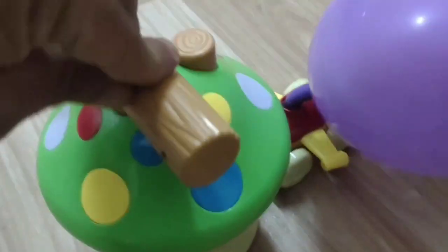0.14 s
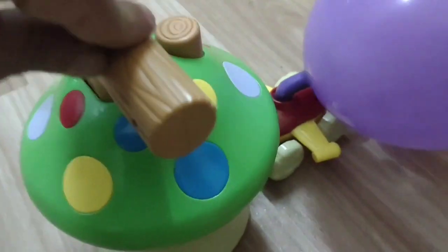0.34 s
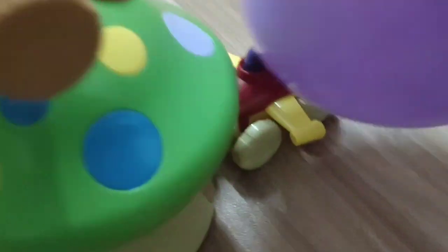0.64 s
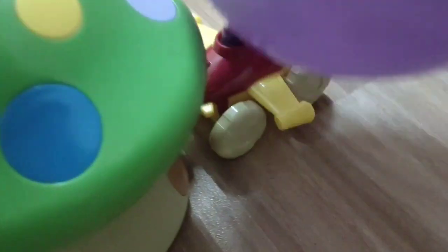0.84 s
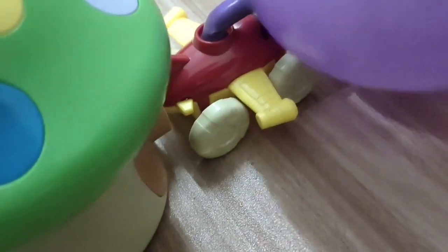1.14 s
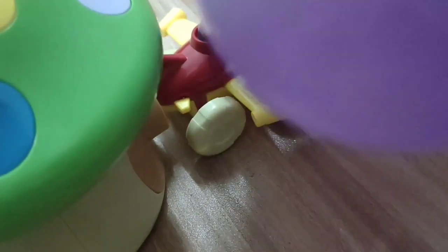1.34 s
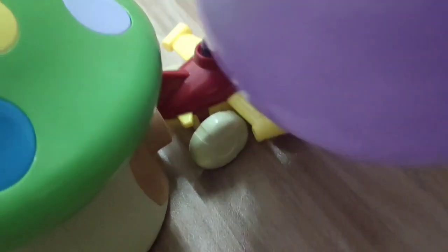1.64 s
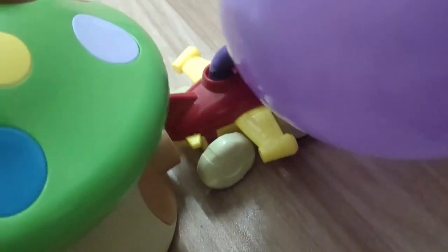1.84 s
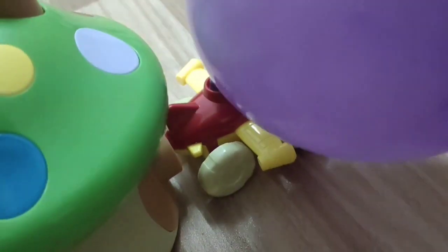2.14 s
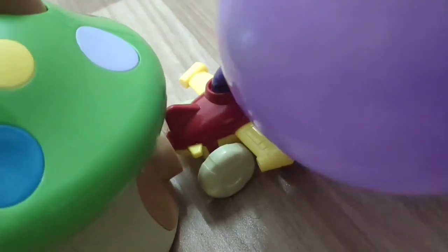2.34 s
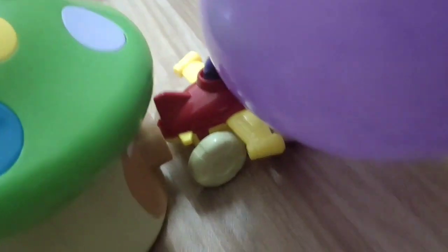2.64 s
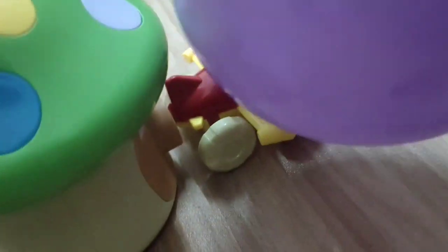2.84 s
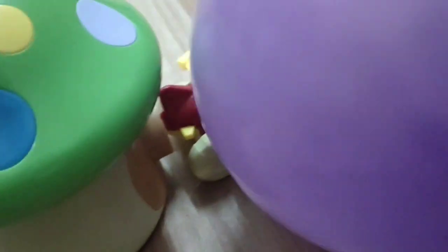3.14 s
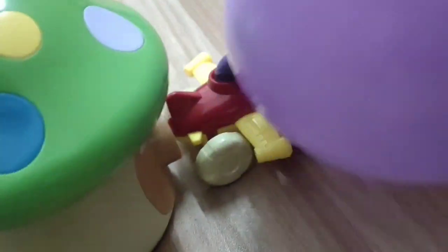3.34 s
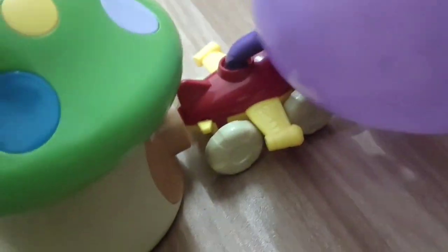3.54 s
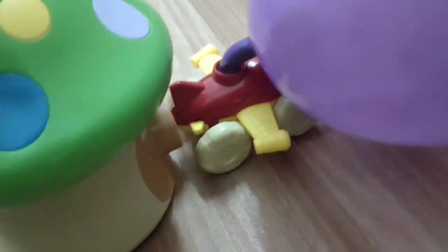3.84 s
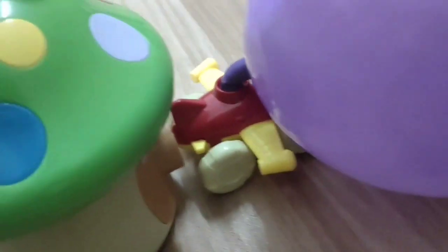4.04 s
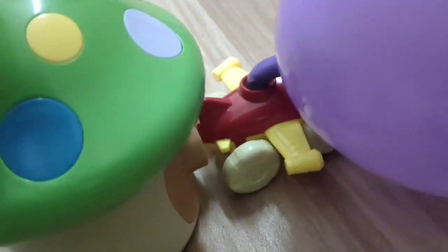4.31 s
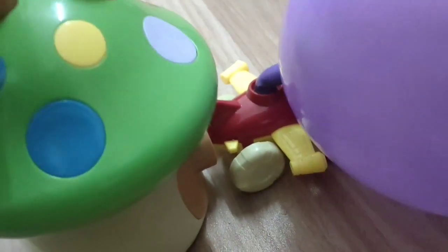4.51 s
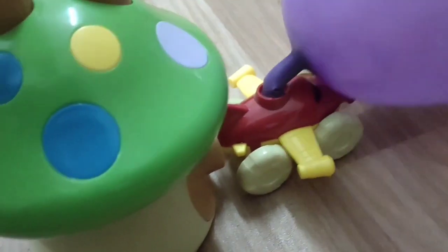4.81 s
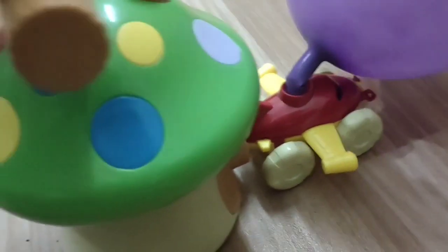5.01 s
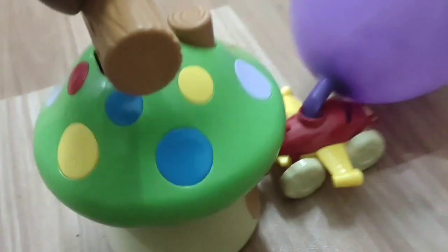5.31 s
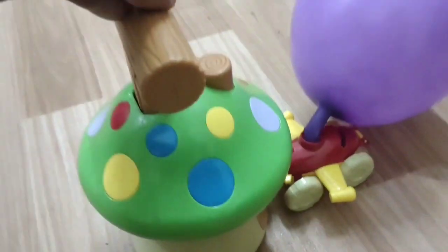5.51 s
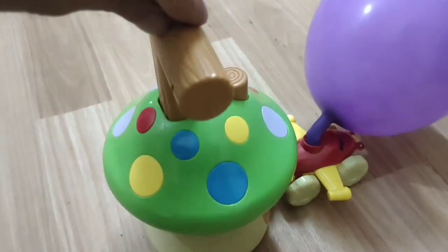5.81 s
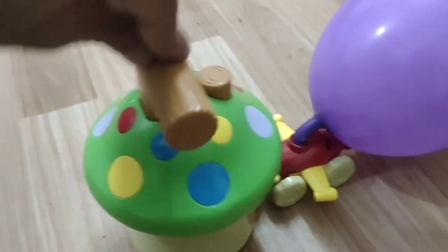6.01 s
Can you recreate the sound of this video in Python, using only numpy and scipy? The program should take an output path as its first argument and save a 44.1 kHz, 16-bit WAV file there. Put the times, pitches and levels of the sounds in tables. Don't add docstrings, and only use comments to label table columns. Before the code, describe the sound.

Short turbulent air jets, bright and sizzly with a slightly hollow barrel tone, come from a small plastic pump very close to the microphone. Between them air is drawn in softly, the plunger clicks and the base thuds. After the first puff comes a long lull, then four pushes, the third of the whole series being strong and the fourth strongest. Faint room rumble, distant hum and a thin insect-like flutter lie behind.

```python
import sys
import numpy as np
from scipy import signal
from scipy.fft import rfft, irfft, next_fast_len
from scipy.io import wavfile
from scipy.ndimage import uniform_filter1d

SR = 44100
rng = np.random.default_rng(int(sys.argv[2]) if len(sys.argv) > 2 else 0)


def gain_from_db(level_db):
    decades = np.asarray(level_db, float) / 20
    return 10 ** decades


def dump(signal):
    limited = np.clip(np.atleast_2d(signal).T, -1, 1)
    pcm = np.round(limited * 32767).astype(np.int16)
    wavfile.write(sys.argv[1], SR, pcm)


N = 271656

# time in seconds, jet level in dB.
STROKES = [
    [(0.0, -42.5), (0.016, -48.5), (0.03, -36), (0.122, -30), (0.172, -30), (0.198, -45), (0.3, -59)],
    [(2.756, -51), (2.766, -37), (2.788, -31.5), (2.856, -28.5), (2.964, -36), (3.032, -58), (3.06, -48)],
    [(3.45, -70), (3.48, -48), (3.5, -41), (3.548, -29.5), (3.632, -26), (3.652, -40), (3.7, -50.5),
     (3.76, -55)],
    [(4.19, -77), (4.24, -37), (4.33, -25), (4.39, -28.5), (4.416, -40), (4.47, -53.5), (4.52, -60)],
    [(4.938, -57), (4.946, -46.5), (5.026, -31), (5.118, -33), (5.198, -52.5), (5.24, -47)],
    [(6.07, -78), (6.094, -65), (6.13, -45.5), (6.16, -42)],
]
# valve sizzle over the jet at the start in dB, its sag in dB per second,
# barrel ring over the jet in dB.
STROKE_COLOURS = [(14.7, 40, 1), (8.9, 25, -2), (20.7, 122, -3.5), (19.2, 105, -6.5), (6, 45, -4),
                  (8, 33, 3)]
# left lag in samples, right port sizzle in dB,
# lower valve resonance in Hz, its level in dB.
PORT_PATHS = [(1.1, -11.5, 11260, 0), (5.85, -9, 10850, -1), (3.26, -11, 10850, 3.5), (3.35, -13, 10800, 3),
              (3.34, -11, 11400, -2), (1.8, -7, 11500, 4)]
# frequency in Hz, density in dB per Hz.
JET_SPECTRUM = [(470, -46), (900, -11.5), (2000, -16), (3200, -7), (4500, -1), (5600, -1.5), (8000, -0.5),
                (10500, -6.5), (12500, -19), (15500, -24.5)]
# frequency in Hz, width in Hz, level in dB.
VALVE_RESONANCES = [(13090, 1240, 5.5), (14100, 1100, -6.5)]
# frequency in Hz, width in Hz.
BARREL = (3116, 1950)
# null in Hz, glide in Hz per second, width in
# Hz, second null in Hz, its width in Hz.
STROKE_NULLS = [(9250, 1400, 260, 7150, 400), (4020, -700, 560, 7620, 340), (3860, 1100, 460, 8550, 520),
                (4070, -300, 400, 8620, 520), (12020, -800, 180, 8500, 60), (4000, 0, 60, 8500, 60)]
# null in Hz, width in Hz.
RIGHT_NULLS = [(5800, 460), (12150, 400), (14150, 480)]
# frequency in Hz, density in dB per Hz.
WASH_SPECTRUM = [(15, -73), (25, -65), (49, -27), (97, -4), (116, -14.5), (133, -9), (197, 1.5), (311, -3),
                 (745, -9), (798, -11.5), (1070, -7), (1550, -16.5), (2190, -18.5), (2800, -22),
                 (3300, -28), (6000, -39), (7800, -56), (13200, -120)]
# frequency in Hz, likeness from 0 to 1.
WASH_LIKENESS = [(30, .5), (60, 0.85), (130, 1), (290, 0.9), (640, 0.59), (1400, 0.017), (3000, 0)]
# frequency in Hz, left over right in dB.
WASH_LEAN = [(60, 6.5), (120, -3), (240, 0), (480, -0.5), (950, -0.5), (1890, 4.5), (3770, 2.5), (7520, 5),
             (15000, -0.5)]
# time in seconds, bass level in dB.
FAR_TRAFFIC = [(0.0, 0), (0.3, -6.5), (0.9, -1.5), (2.1, -2.5), (2.8, 1), (5.3, 1), (6.16, -4)]
INSECT_BEATS = [0.0, 0.458, 1.1, 1.925, 2.665, 3.325, 4.162, 4.81, 5.47, 6.022, 6.206]
# frequency in Hz, width in Hz.
HUM = (104.5, 5.7)
WHINE = (492, 160)
# peak time in seconds, level in dB, fade in dB per second.
HUM_SWELLS = [
    (0.34, -37, 87),
    (1.3, -49, 50),
    (2.01, -38, 103),
    (2.43, -41.5, 110),
    (2.78, -50, 62),
    (3.85, -50, 16),
    (4.39, -44, 76),
    (5.18, -46, 7),
    (5.9, -50, 20),
]
# peak time in seconds, level in dB, fade in dB per second.
WHINE_SWELLS = [
    (0.0, -43, 68),
    (0.34, -50.5, 36),
    (5.01, -50, 71),
    (5.9, -42.5, 37),
]
# peak time in seconds, level in dB, fade in dB per second.
RUMBLE_SWELLS = [
    (0.0, -49.5, 130),
    (0.31, -42.5, 130),
    (0.72, -45.5, 62),
    (1.5, -57, 43),
    (2.9, -63, 53),
    (5.3, -59, 49),
    (6.0, -48, 5.8),
]
# time in seconds, peak in dB, frequency in Hz, t60 in seconds.
KNOCKS = [
    (0.19, -11.5, 225, 0.047),
    (0.223, -21, 176, 0.067),
    (0.287, -22, 178, 0.078),
    (0.338, -13.5, 105, 0.036),
    (0.384, -23, 470, 0.034),
    (5.349, -17, 180, 0.037),
    (5.901, -18.5, 142, 0.064),
]
# time in seconds, peak in dB, left over right in dB, share of low body in dB,
# body frequency in Hz.
TICKS = [(0.192, -46, 0.0, 28, 900), (0.577, -47, 1.5, 10, 2260), (0.61, -41, 11, 6.5, 2540),
         (1.931, -45.5, 14, 4, 2070), (2.472, -55, 11, 11, 2010), (3.017, -38.5, 2, 14, 1980),
         (3.1793, -33, -11, 3.5, 2150), (3.4201, -44, 2.5, 7, 2070), (3.463, -28, 17, -11, 2880),
         (3.8761, -64, -7, -7, 2650), (3.922, -44, -16, 6, 3880), (3.932, -31, 11.5, 1.5, 3950),
         (4.1969, -39, 0.0, 4, 3790), (4.208, -33.5, 10, 3, 4430), (4.4387, -30, 8, 3, 2820),
         (4.5387, -31, 7, 0.5, 2470), (4.6264, -34, -9, 1, 2500), (4.641, -29, 17, -6.5, 2080),
         (4.941, -35, 14, -5, 4420), (5.3697, -41, 7, 3, 2130), (5.3905, -37, 18, 4, 2470),
         (5.7957, -47, 7.5, 13.5, 2370), (6.0796, -48, 9, 11.5, 3270)]
# start in seconds, plunger at the top in seconds, level at the start
# in dB, level at the top in dB.
INTAKES = [
    (0.262, 0.604, -52.5, -76),
    (3.02, 3.226, -63, -57),
    (3.7, 4.02, -62, -59.5),
    (4.465, 4.714, -53, -60.5),
    (5.197, 5.412, -53, -67),
]
# time in seconds, peak in dB, frequency in Hz, t60 in seconds.
PINGS = [
    (0.392, -43, 3680, 0.03),
    (0.5516, -44, 3530, 0.03),
    (2.472, -48, 4500, 0.03),
    (3.4206, -53, 3640, 0.033),
    (3.9225, -47, 3860, 0.03),
]
# frequency in Hz, t60 in seconds.
ROOM_DECAY = [(200, 0.8), (2000, 0.57), (6000, 0.37), (15000, 0.51)]

FULL_DB, SIZZLE_NEEDS, SIZZLE_LEAST_DB, BARREL_KEEPS = 3, 1, -1, 0.11
ECHO_DRIFT_PER_S = 0.26
NULL_WITHIN_DB, UPPER_NULL_S = 16, 0.12
WASH_DB, TRAFFIC_MIDDLE = -40.5, 0.07
INSECT_DB, THROB_S = -60, 0.092
TICK_S = 0.0095
INTAKE_FADE_DB_PER_S = 124
MIC_HISS_DB = -66


def evened(x):
    return x / np.sqrt(np.mean(x ** 2) + 1e-20)


def read(points, hz):
    f, value = np.transpose(points)
    return np.interp(np.log(hz + 1), np.log(f + 1), value)


def add(mix, s, sound):
    part = mix[:, max(round(s * SR), 0):][:, :sound.shape[1]]
    part += sound[:, :part.shape[1]]


def coloured(x, gain):
    size = next_fast_len(x.shape[-1] + 1024)
    return irfft(rfft(x, size) * gain(np.fft.rfftfreq(size, 1 / SR)), size)[..., :x.shape[-1]]


def peak(hz, centre_hz, width_hz):
    return 1 / (1 + 2j * (hz - centre_hz) / width_hz)


def gusts(size, span, depth_db):
    flicker = uniform_filter1d(uniform_filter1d(rng.standard_normal(size), int(span)), int(span))
    return gain_from_db(depth_db * evened(flicker))


def swells(rows):
    t = np.arange(N) / SR
    return sum(gain_from_db(db - abs(fade) * abs(t - s)) for s, db, fade in rows)


def valve(hz, low_hz, low_db):
    resonances = [*VALVE_RESONANCES, (low_hz, 900, low_db)]
    ring = sum(gain_from_db(db) * peak(hz, f, w) for f, w, db in resonances)
    return ring / (1 + (9500 / (hz + 1)) ** 12)


def stroke(rows, colour, path):
    s, jet_db = np.transpose(rows)
    start_db, sag, barrel_db = colour
    lag, right_sizzle_db, low_hz, low_db = path
    t = np.arange(s[0], s[-1], 1 / SR)
    jet_db = np.interp(t, s, jet_db)
    slack_db = np.maximum(jet_db.max() - FULL_DB - jet_db, 0)
    sizzle_db = np.maximum(start_db - sag * (t - s[0]) - SIZZLE_NEEDS * slack_db, SIZZLE_LEAST_DB)
    ring_db = jet_db + barrel_db + BARREL_KEEPS * slack_db - 7.0

    shared, own = rng.standard_normal(len(t)), rng.standard_normal((2, len(t)))
    air = (shared + 0.8 * own) * gusts(len(t), 40, 1.4) * gusts(len(t), 400, 0.4)
    jet = gain_from_db(jet_db) * evened(coloured(air, lambda hz: gain_from_db(read(JET_SPECTRUM, hz))))
    sizzle = gain_from_db(jet_db + sizzle_db) * evened(coloured(air, lambda hz: valve(hz, low_hz, low_db)))
    barrel = gain_from_db(ring_db) * evened(coloured(air, lambda hz: peak(hz, *BARREL) ** 2))
    ports = gain_from_db([[6.5], [5.4]]) * (jet + barrel) + gain_from_db([[4.5], [3.5 + right_sizzle_db]]) * sizzle

    hz, u, z = signal.stft(ports, SR, nperseg=512, noverlap=384)
    turn = -2j * np.pi * hz[:, None]
    echoes = 0.14 * rng.standard_normal((2, 5, 1, 1))
    delays = rng.uniform(0.0002, 0.003, (2, 5, 1, 1))
    moving = delays * (1 + ECHO_DRIFT_PER_S * rng.uniform(0.3, 2.1, (2, 5, 1, 1)) * u)
    z *= 1 + (echoes * np.exp(turn * moving)).sum(1)

    eddies = uniform_filter1d(rng.standard_normal(z.shape[1:]), size=3, axis=0)
    z *= gain_from_db(2.5 * evened(uniform_filter1d(eddies, size=11, axis=1)))
    z[0] *= np.exp(turn * lag / SR)
    sound = signal.istft(z, SR, nperseg=512, noverlap=384)[1][:, :len(t)]
    fade_in = np.clip((t - s[0]) / 0.006, 0, 1)
    fade_out = np.clip((s[-1] - t) / 0.05 + (s[-1] > 6.1), 0, 1)
    return s[0], sound * fade_in * fade_out


def nulls(hz, t):
    gain = np.ones((2, len(hz), len(t)))
    tremble = np.repeat(rng.standard_normal((2, len(t))), 4, 1)[:, :len(t)]
    for rows, (low_hz, glide, width, upper_hz, upper_width) in zip(STROKES, STROKE_NULLS):
        s, jet_db = np.transpose(rows)
        now = (t > s[0]) & (t < s[-1])
        under_peak_db = np.interp(t[now], s, jet_db) - jet_db.max()
        strong = np.clip((under_peak_db + NULL_WITHIN_DB) / 3 + 1, 0, 1)
        rising = strong * (t[now] < t[now][strong.argmax()] + UPPER_NULL_S)
        repeats = np.clip(width / 120 - 3.7, 0, 1)
        lines = [(0, low_hz + glide * (t[now] - s[1]), width, strong),
                 (0, upper_hz, upper_width, rising),
                 (0, 3 * low_hz - 250, 0.6 * width, repeats * rising)]
        lines += [(1, f, w, strong) for f, w in RIGHT_NULLS]
        for port, centre, span, on in lines:
            off = ((hz[:, None] - centre) / span - 0.22 * tremble[port, now]) ** 2
            core = 1 - on * np.exp(-8 * off ** 3)
            skirt = 1 - 0.35 * on * np.exp(-off / 2)
            gain[port:, :, now] *= core * skirt
    return gain


def wash():
    frames, hz = N // 256 + 5, np.fft.rfftfreq(1024, 1 / SR)[:200]
    a, b, c, d, patches = rng.standard_normal((frames, len(hz), 5)).T
    patches = evened(uniform_filter1d(uniform_filter1d(patches, 4, 0), 10, 1))
    s, bass_db = np.transpose(FAR_TRAFFIC)
    t = np.arange(frames) * 256 / SR
    bass = 1 / (1 + (hz[:, None] / 270) ** 4)
    swell_db = (bass + (1 - bass) * TRAFFIC_MIDDLE) * np.interp(t, s, bass_db)
    same = np.clip(read(WASH_LIKENESS, hz), -1, 1)[:, None]
    left = a + 1j * b
    z = np.array([left, same * left + np.sqrt(1 - same ** 2) * (c + 1j * d)])
    lean_db = np.multiply.outer([0.5, -0.5], read(WASH_LEAN, hz))[..., None]
    z *= gain_from_db(read(WASH_SPECTRUM, hz)[:, None] + lean_db + 1.5 * patches + swell_db)
    z = np.pad(z, ((0, 0), (0, 513 - len(hz)), (0, 0)))
    return gain_from_db(WASH_DB) * evened(signal.istft(z, nperseg=1024, noverlap=768)[1][:, :N])


def drone():
    noise = rng.standard_normal((2, N))
    hum = evened(coloured(noise[0], lambda hz: peak(hz, *HUM) ** 2))
    whine = evened(coloured(noise[1], lambda hz: peak(hz, *WHINE) ** 2))
    hum = gain_from_db(-7.0) * swells(HUM_SWELLS) * hum
    return hum * gain_from_db([[-0.8], [0.8]]) + swells(WHINE_SWELLS) * whine


def rumble():
    lumps = coloured(rng.standard_normal((2, N)), lambda hz: peak(hz, 73, 39) ** 2)
    return gain_from_db([[-1.5], [1.5]]) * swells(RUMBLE_SWELLS) * evened(lumps)


def insect():
    throbs = np.round(np.diff(INSECT_BEATS) / THROB_S)
    turns = np.interp(np.arange(N) / SR, INSECT_BEATS, np.r_[0, np.cumsum(throbs)])
    throb = gain_from_db(INSECT_DB + 3.3 * np.cos(2 * np.pi * turns))
    flutter = rng.standard_normal((2, N)) * gusts(N, 60, 1.5)
    wings = coloured(flutter, lambda hz: peak(hz, 6950, 540) ** 2)
    return gain_from_db([[-0.5], [-5.5]]) * throb * evened(wings)


def knock(db, hz, t60):
    t = np.arange(4000) / SR
    ring = np.sin(2 * np.pi * hz * t) * gain_from_db(db - 3.0 - 60 * t / t60) * (1 - np.exp(-t * hz / 1.43))
    return np.array([ring, ring])


def tick(db, pan_db, body_db, body_hz):
    u = np.arange(1500) / SR / TICK_S
    burst = rng.standard_normal(1500) * gusts(1500, 15, 2) * u ** 2 * np.exp(2 - u * 4) * 4
    bright = coloured(burst, lambda hz: 1 / (1 + (5000 / (hz + 1)) ** 4))
    body = coloured(burst, lambda hz: 2.72 * peak(hz, body_hz, 3500) * hz / (hz + 900))
    sound = gain_from_db(db - 13.0) * (bright + gain_from_db(body_db) * body)
    return np.array([gain_from_db(pan_db / 2) * np.roll(sound, 3), gain_from_db(-pan_db / 2) * sound])


def intake():
    level, t = np.zeros(N), np.arange(N) / SR
    for start, top, start_db, top_db in INTAKES:
        draw_db = np.interp(t, [start, top], [start_db, top_db])
        level += (t > start) * gain_from_db(draw_db - INTAKE_FADE_DB_PER_S * np.maximum(t - top, 0))
    air = coloured(rng.standard_normal((2, N)), lambda hz: 1 / (1 + (2500 / (hz + 1)) ** 4) / (1 + hz / 9000))
    return gain_from_db([[2.5], [0.1]]) * uniform_filter1d(level, 600) * evened(air) * gusts(N, 200, 2.3)


def room(x):
    taps = np.zeros((2, SR // 2))
    slots = np.arange(220, SR // 2 - 20, 20)
    at = slots + rng.integers(0, 20, (2, len(slots)))
    np.put_along_axis(taps, at, rng.choice([-1., 1.], at.shape), 1)
    hz, t, z = signal.stft(taps, SR, nperseg=256)
    tail = signal.istft(z * gain_from_db(-60 * t / read(ROOM_DECAY, hz)[:, None]), SR, nperseg=256)[1]
    return signal.oaconvolve(x, tail / np.linalg.norm(tail[0]), axes=1)[:, :N]


def scene():
    pump = intake()
    for row in zip(STROKES, STROKE_COLOURS, PORT_PATHS):
        add(pump, *stroke(*row))
    for s, *row in TICKS:
        add(pump, s - 0.002, tick(*row))
    for s, *row in KNOCKS:
        add(pump, s, knock(*row))
    for s, *row in PINGS:
        add(pump, s, gain_from_db(0.5) * knock(*row))
    diffuse = coloured(pump.mean(0), lambda hz: 1 / (1 + (hz / 11000) ** 2))
    reverb = gain_from_db([[-13], [-14]]) * room(diffuse[None])
    return pump + reverb + wash() + drone() + rumble() + insect()


def top_cut(x):
    return signal.sosfilt(signal.butter(12, 16450, fs=SR, output="sos"), x)


def record(dry):
    hiss = coloured(rng.standard_normal((2, N)), lambda hz: (1 + hz / 30000) / (1 + (3000 / (hz + 1)) ** 2))
    hiss = gain_from_db(MIC_HISS_DB + np.array([[5.6], [4.4]])) * evened(hiss)
    overloaded = 1.302 * np.tanh(dry / 1.296)
    heard = coloured(overloaded + hiss, lambda hz: 1 / (1 + (52 / (hz + 1)) ** 4))
    hz, t, z = signal.stft(heard, SR, nperseg=1024, noverlap=512)
    mix = signal.istft(z * nulls(hz, t), SR, nperseg=1024, noverlap=512)[1][:, :N]
    return top_cut(mix)


dry = scene()
out = record(dry)
dump(out)
```